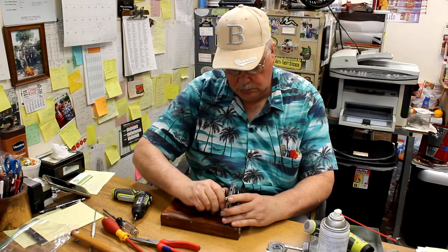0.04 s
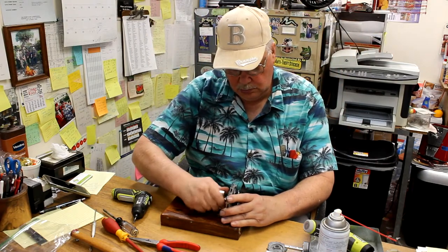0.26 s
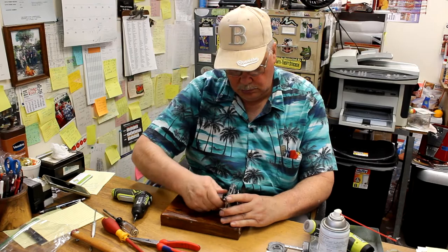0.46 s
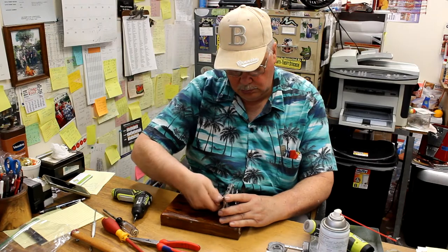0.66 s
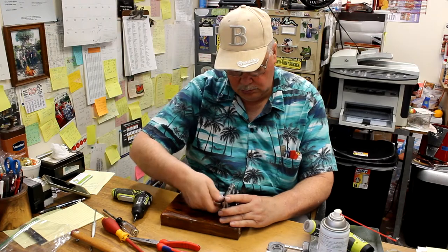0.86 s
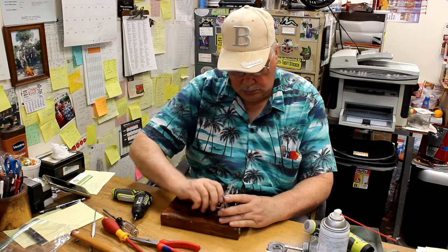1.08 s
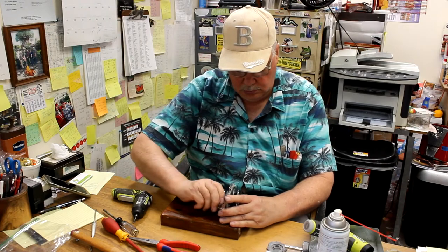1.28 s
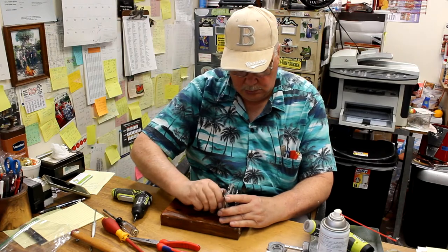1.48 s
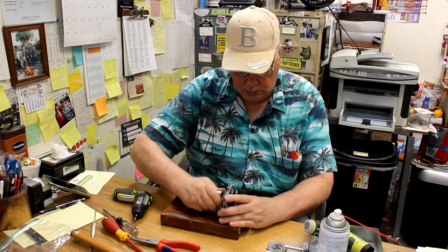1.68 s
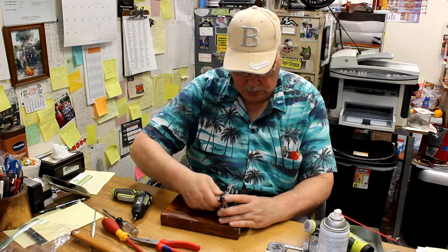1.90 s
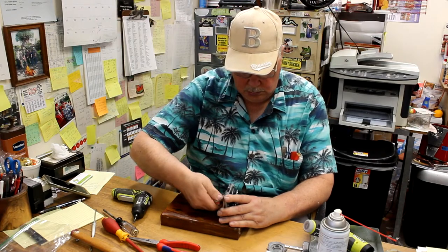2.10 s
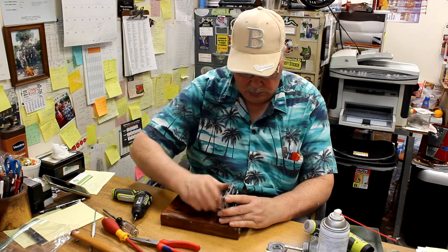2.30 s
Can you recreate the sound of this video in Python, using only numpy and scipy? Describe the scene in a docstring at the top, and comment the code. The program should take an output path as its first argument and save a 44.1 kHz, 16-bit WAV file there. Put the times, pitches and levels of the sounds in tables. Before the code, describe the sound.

Sharp metal ratchet clicks as a hand-turned coin mechanism snaps, jangles and clunks on a workbench.

```python
"""Over a low mains hum, the crank of a small coin mechanism is turned twice by hand in a small room.
On the first turn loose metal ticks, the wooden base clunks on the workbench and a steel pawl snaps
over its ratchet. Between turns the handle knocks softly in its play. On the second turn the base
clunks again, a coin jangles and rings, and metal scrapes round in the housing.
Three more pawl snaps and a soft double knock of the handle finish it."""
import sys
import numpy as np
from scipy import signal
from scipy.fft import rfft, irfft
from scipy.io import wavfile

SR = 44100
rng = np.random.default_rng(int(sys.argv[2]) if len(sys.argv) > 2 else 0)


def transcribe(u):
    """Save the signal u as a 16-bit wav file named by the first command-line argument.

    u: samples, shape (n,) or (channels, n), limited to [-1, 1]; the rate is SR.
    q: integer samples, one column per channel.
    """
    v = np.clip(np.atleast_2d(u).T, -1, 1)
    q = np.round(v * 32767).astype(np.int16)
    wavfile.write(sys.argv[1], SR, q)


N = 108045
TIME, T = np.arange(N) / SR, np.arange(SR // 2) / SR  # time axes of the scene and of one hit [s]
CHATTER_S, CHATTER_TILT_DB = 0.0078, -1  # steel chatter: decay, and dulling per octave
PAWL_WIDTH_HZ = 600
# tone of struck steel (frequency [Hz], level [dB])
STEEL = [(100, -30), (850, -30), (1150, -1), (1380, -10.5), (1600, 0), (1870, -6.5), (2200, -1.5),
         (2600, -2), (3800, 2.5), (5300, 3), (6100, 2), (7100, 2), (8500, -2), (10200, -1.5), (11200, -9.5),
         (13500, -16.5), (16000, -24.5)]
# tone of the metal housing (frequency [Hz], level [dB])
HOUSING = [(100, -12), (400, -3), (720, -10.5), (900, -0.5), (1030, -4.5), (1220, 7), (1350, -8.5),
           (1620, 3), (1900, -4), (2400, 3), (3200, -6.5), (3700, -11.5), (4800, -9), (5600, -22),
           (9000, -33), (15000, -59)]
# envelope of metal dragging round the housing (time [s], level [dB])
DRAG = [(1.38, -50), (1.44, -62), (1.50, -47.5), (1.58, -50), (1.66, -50), (1.70, -39), (1.735, -52),
        (1.775, -33.5), (1.82, -44.5), (1.87, -37), (1.895, -44), (1.925, -38), (1.985, -35), (2.04, -42.5),
        (2.11, -43.5), (2.135, -67)]


def amp(db):
    """Decibels to gain."""
    return 10 ** (np.asarray(db) / 20)


def read(points, hz):
    """A table joined by straight lines over log frequency."""
    f, value = np.transpose(points)
    return np.interp(np.log(hz + 1), np.log(f + 1), value)


def fader(points, outside_db=None):
    """A gain curve over the scene through (time [s], level [dB]) points."""
    return amp(np.interp(TIME, *np.transpose(points), left=outside_db, right=outside_db))


def evened(x):
    """Scales to rms 1."""
    return x / np.sqrt(np.mean(x ** 2) + 1e-20)


def unit(x):
    """Scales a hit to the energy of 5 ms at rms 1."""
    return x / np.sqrt(np.sum(x ** 2) / (.005 * SR) + 1e-20)


def add(mix, s, sound):
    """Mixes a sound in at time s."""
    part = mix[max(round(s * SR), 0):][:len(sound)]
    part += sound[:len(part)]


def through(x, response):
    """Convolves and keeps the length."""
    return signal.fftconvolve(x, response)[:len(x)]


def colour(x, points, tilt_db=0, peaks=(), size=4096):
    """Minimum-phase EQ with a tilt per octave and peaks (centre [Hz], width [Hz], lift [dB])."""
    hz = abs(np.fft.fftfreq(size, 1 / SR))
    db = read(points, hz) + tilt_db * np.log2(np.clip(hz, 100, 5000) / 1000)
    boost = sum(amp(lift) ** 2 / (1 + (2 * (hz - centre) / width) ** 2) for centre, width, lift in peaks)
    db += 10 * np.log10(1 + boost)
    spectrum = np.exp(np.conj(signal.hilbert(np.log(amp(db)))))
    return through(x, np.fft.ifft(spectrum).real[:size // 2])


def burst(decay_s, rise_s=0):
    """A dying chatter of tiny contacts with an even spectrum."""
    fade = np.exp(-T / decay_s) * np.minimum(T / max(rise_s, 1e-5), 1)
    x = rng.standard_normal(len(T)) * fade
    for _ in range(4):  # flatten the spectrum, then shape the decay again
        z = rfft(x)
        x = irfft(z / (abs(z) + 1e-12), len(T)) * np.sqrt(fade)
    return unit(x)


def ring(modes, rise_s=0.002):
    """Dying sines of a struck object (frequency [Hz], level [dB], t60 [s])."""
    sines = sum(amp(db - 60 * T / t60) * np.sin(2 * np.pi * (hz * T + rng.random()))
                for hz, db, t60 in modes)
    return unit(sines * np.minimum(T / rise_s, 1))


def grains(per_s=2500, spread_db=3.5):
    """Tiny slips of uneven size."""
    slips = rng.choice([-1, 1], N) * amp(spread_db * np.minimum(rng.exponential(1, N), 4))
    return slips * (rng.random(N) < per_s / SR)


def background():
    """A bed of room air and mains hum that dips briefly near the end."""
    # tone of the air (frequency [Hz], level [dB])
    air_tone = [(15, -39.5), (25, -10.5), (180, -7), (249, -12), (405, -11), (560, -14), (714, -18),
                (1070, -14.5), (1480, -19.5), (9320, -33.5), (16000, -53.5)]
    # hum partials ahead of the fader (frequency [Hz], level [dB])
    partials = [(120, -51.5), (240, -52), (356, -60.5)]
    # fader ride on the whole bed (time [s], gain [dB])
    ride = [(2.12, -7), (2.22, -10.5), (2.45, -6.5)]
    air = irfft(rfft(rng.standard_normal(N)) * amp(read(air_tone, np.fft.rfftfreq(N, 1 / SR))), N)
    hum = sum(amp(db) * evened(np.sin(2 * np.pi * (hz * TIME + rng.random()))) for hz, db in partials)
    return (amp(-46) * evened(air) + hum) * fader(ride)


def ticks():
    """Loose metal parts chatter lightly, without a hard attack, and tap the base."""
    # (time [s], level [dB], resonance [Hz], base tap [dB])
    cues = [(0.2108, -33, 9700, 1), (0.4672, -37, 3360, 3), (0.5678, -25.5, 6100, -7.5),
            (0.659, -37.5, 6800, -4), (0.7998, -33, 4970, -12), (1.3944, -23, 5900, -2.5),
            (1.411, -27, 6060, 0), (1.437, -34, 6540, -11), (1.8674, -42.5, 10300, 9.5)]
    out = np.zeros(N)
    for s, db, hz, base_db in cues:
        chatter = unit(colour(burst(CHATTER_S), STEEL, CHATTER_TILT_DB, [(hz, PAWL_WIDTH_HZ, 7)]))
        add(out, s, amp(db) * (chatter + amp(base_db) * base_tap()))
    return out


def base_tap():
    """The wooden base answers a click and gives it body."""
    # tone of the tapped base (frequency [Hz], level [dB])
    tap_tone = [(60, -26.5), (120, 3.5), (220, -13), (350, -2.5), (480, 1), (600, -7), (700, -1),
                (830, -12.5), (1500, -12), (8000, -79)]
    return unit(colour(burst(decay_s=0.0041, rise_s=.002), tap_tone))


def base_clunks():
    """The base rocks: the wooden block thuds on the bench and the board rings."""
    # (time [s], level [dB], bass weight [dB/octave], decay [s], block thud [dB])
    cues = [(0.2109, -26.5, -4, 0.01, -6), (.3120, -17.5, 1, .0053, 0), (0.3244, -18.5, -1, 0.01, -16),
            (.335, -21.5, 5, 0.028, -3), (1.3807, -22.5, -2.5, 0.0044, 5), (1.3920, -22, 0, 0.007, -12),
            (1.407, -36, 1.5, 0.008, -29), (1.741, -36.5, 4.5, 0.017, 0.5), (1.87, -36.5, 4, 0.029, -1)]
    # tone of wood on wood (frequency [Hz], level [dB])
    wood_tone = [(15, -59), (35, -35.5), (75, -1), (160, -6), (340, -1.5), (500, -4), (700, -9),
                 (870, -6.5), (1300, -22.5), (3000, -24.5), (6000, -36), (14000, -62.5)]
    # modes of the board (frequency [Hz], level [dB], t60 [s])
    board_modes = [(114.6, -4.5, 0.19), (180.5, -1.5, 0.09), (246, 6, 0.059), (338, 2, .1), (410, 0.5, .04),
                   (520, -15, 0.043), (879, 0, 0.082), (1193, -11, 0.079)]
    out = np.zeros(N)
    for s, db, weight_db, decay_s, block_db in cues:
        weighted = [(hz, level - weight_db * np.log2(hz), t60) for hz, level, t60 in board_modes]
        board = amp(2) * ring(weighted, rise_s=0.0057)
        impact = unit(colour(burst(decay_s, rise_s=0.0032), wood_tone, -weight_db))
        thud = amp(block_db) * ring([(356.7, 0, 0.032)], rise_s=0.017)
        add(out, s, amp(db) * (unit(impact + board) + thud))
    return out


def ratchet():
    """Each snap is a hard contact and a chatter that ring pawl, wheel and tip and tap the base."""
    # pawl snaps (time [s], level [dB], pawl pitch [Hz], pawl lift [dB], wheel pitch [Hz],
    # wheel lift [dB], tip lift [dB], base tap [dB], chatter against contact [dB])
    snaps = [(.3160, -16, 4840, -8, 8000, 3, -2, -3.5, 36),
             (0.3523, -14, 4900, 6.5, 7700, 10, 4.5, -16.5, 11),
             (0.4908, -15, 4540, -0.5, 7600, 10.5, 7.5, -10.5, 4),
             (0.6058, -13.5, 4820, 6.5, 7570, 9, 10.5, -12.5, -3.5),
             (.6902, -16, 4980, 7, 7600, 4.5, 10, -16, -3), (0.8095, -19, 5130, 5, 7540, 4, 8.5, -15, 3),
             (1.9349, -14, 2930, 8, 7750, 12.5, 3, -12.5, 2),
             (2.0129, -15, 5700, 6, 7050, 4.5, -21, -28.5, 10),
             (2.1416, -15, 4280, 8.5, 7200, 6.5, 5.5, -18.5, -0.5)]
    # early reflections off the bench (delay [s], level [dB])
    bench_echoes = [(.0037, -10.5), (.0074, -11)]
    wheel_width_hz, tip_hz, tip_width_hz = 600, 9600, 1000
    out = np.zeros(N)
    for s, db, pawl_hz, pawl_db, wheel_hz, wheel_db, tip_db, base_db, chatter_db in snaps:
        peaks = [(pawl_hz, PAWL_WIDTH_HZ, pawl_db), (wheel_hz, wheel_width_hz, wheel_db),
                 (tip_hz, tip_width_hz, tip_db)]
        contact = unit(colour(burst(decay_s=0.0013, rise_s=0.000514), STEEL, peaks=peaks))
        chatter = amp(chatter_db) * unit(colour(burst(CHATTER_S), STEEL, CHATTER_TILT_DB, peaks))
        add(out, s, amp(db) * (unit(contact + chatter) + amp(base_db) * base_tap()))
        for delay_s, echo_db in bench_echoes:
            scatter_s = .0005 * rng.uniform(-1, 1)
            echo = unit(colour(burst(decay_s=0.0015), STEEL, CHATTER_TILT_DB, peaks))
            add(out, s + delay_s + scatter_s, amp(db + echo_db) * echo)
    add(out, .5672, amp(-38) * ring([(12300, 0, 0.08)]))  # the pawl spring pings once
    return out


def handle_knocks():
    """The handle knocks in its play, damped by the hand, with a faint tick of the housing."""
    # (time [s], level [dB], pitch [Hz], metal tick [dB])
    cues = [(.53, -35, 402, -16), (0.764, -34, 359, -11), (0.9979, -32.5, 386, -33),
            (1.2283, -35, 383, -14), (1.622, -40.5, 388, -20), (1.742, -37, 485, -13),
            (1.869, -37, 437, -24), (2.3247, -31.5, 397, -37), (2.3585, -40.5, 395, -23)]
    # modes of the handle (multiple of the pitch, level [dB], t60 [s])
    modes = [(0.999, 0, 0.023), (1.8, -10.5, 0.021)]
    out = np.zeros(N)
    for s, db, hz, tick_db in cues:
        bump = ring([(hz * multiple, level, t60) for multiple, level, t60 in modes], rise_s=0.0048)
        tick = unit(colour(burst(CHATTER_S), HOUSING, tilt_db=16))
        add(out, s, amp(db) * (bump + amp(tick_db) * tick))
    return out


def coin():
    """Loose metal jangles as the coin enters; each touch renews its thin, high ring."""
    # envelope of the jangle (time [s], level [dB])
    jangle = [(1.378, -58), (1.388, -25.5), (1.42, -41), (1.445, -50), (1.46, -40), (1.48, -47),
              (1.52, -74)]
    # the coin is struck and rings until damped (time [s], level [dB], t60 [s])
    hits = [(1.3942, -29, 0.037), (1.4125, -26, 0.26), (1.4480, -31, 0.11), (1.482, -30.5, 0.24),
            (1.524, -33.5, 0.037), (1.556, -43.5, 0.84), (1.775, -52.5, 0.9), (1.845, -48, 0.81)]
    # modes of the coin (frequency [Hz], level [dB])
    modes = [(8882, 1), (8912, 0.5), (8975, -9), (14830, -17), (14890, -23)]
    out = fader(jangle, outside_db=-120) * evened(colour(grains(), STEEL))
    for s, db, t60 in hits:
        add(out, s, amp(db) * ring([(hz, level, t60) for hz, level in modes], rise_s=0.0027))
    return out


def scrape():
    """Slips of dragging metal swell at each catch and ring the housing."""
    # (time [s], level [dB], rise [s], decay [s], brightness [dB/octave])
    catches = [(1.388, -43, 0.005, 0.014, 16), (1.46, -33.5, 0.0027, 0.0091, 26.5),
               (1.47, -26.5, 0.0087, 0.0075, -3.5), (1.524, -21, 0.0023, 0.0049, 12),
               (1.5351, -24.5, .003, 0.0085, 0), (1.618, -23.5, 0.0054, 0.0049, 3.5),
               (1.689, -43, 0.004, 0.025, -1.5), (1.7820, -29, 0.0014, 0.0025, 11),
               (1.848, -28, 0.0021, 0.0045, 8), (1.919, -25, 0.0018, 0.0048, 10.5),
               (2.066, -33.5, 0.0056, 0.0029, 7.5)]
    rub = fader(DRAG, outside_db=-120) * evened(colour(grains(), HOUSING))
    for s, db, rise_s, decay_s, tilt_db in catches:
        age = TIME - s
        swell = np.exp(-np.where(age < 0, (age / (2 * rise_s)) ** 2, age / decay_s))
        rub += amp(db) * unit(swell * colour(grains(), HOUSING, tilt_db))
    return rub + amp(-7.5) * np.std(rub) * housing_ring(rub)


def housing_ring(rub, step_s=.06, detune_per_khz=.012, spread_db=4):
    """As the contact slides on, the housing's modes shift in strength and pitch; high ones bend most."""
    # modes of the housing (frequency [Hz], level [dB], t60 [s])
    modes = [(930, -8, 0.24), (1216, 2.5, 0.14), (1490, 10, 0.036), (1704, 8, 0.082), (2090, 4, 0.044),
             (2400, 10.5, 0.064), (2740, -1, 0.0515), (3130, 7, .06), (5120, -4, 0.026)]
    out = np.zeros(N)
    for s in np.arange(DRAG[0][0], DRAG[-1][0], step_s):
        shifted = [(hz * (1 + detune_per_khz * hz / 1000 * rng.standard_normal()),
                    db + spread_db * rng.standard_normal(), t60) for hz, db, t60 in modes]
        crossfade = np.sqrt(np.maximum(1 - abs(TIME - s) / step_s, 0))
        out += through(rub * crossfade, ring(shifted))
    return evened(out)


def room(send, onset_s=0.0028):
    """The short, dense tail of a cluttered room, longest in the bass."""
    # tone of the tail (frequency [Hz], level [dB])
    tone = [(200, 1.5), (1500, 4.5), (2800, -0.5), (5000, -1), (8000, -1.5), (14000, -5)]
    # reverb time (frequency [Hz], t60 [s])
    decay = [(100, 0.44), (300, 0.21), (1000, 0.15), (4000, .17), (8000, .18), (15000, 0.14)]
    hz, t, noise = signal.stft(rng.standard_normal(len(T)), SR, nperseg=256)
    fade = amp(read(tone, hz)[:, None] - 60 * t / read(decay, hz)[:, None])
    tail = signal.istft(noise * fade, SR, nperseg=256)[1][:len(T)]
    tail *= np.clip(T / onset_s - .5, 0, 1)  # a brief gap, then the tail fades in
    return through(send, tail / np.linalg.norm(tail))


def scene():
    """Metal, wood and handle, each with its own room send, over the background in mono."""
    metal = ratchet() + ticks() + coin() + scrape()
    wood, knocks = base_clunks(), handle_knocks()
    tail = room(amp(-8.5) * metal + amp(-9) * wood + amp(-11.5) * knocks)
    return (metal + wood + knocks + tail + background())[None]


def record(dry, ceiling=.9, cutoff_hz=15450):
    """Soft saturation rounds off the highest peaks; a low-pass trims the top."""
    lowpass = signal.firwin(255, cutoff_hz, window=("kaiser", 8), fs=SR)
    return signal.oaconvolve(ceiling * np.tanh(dry / ceiling), lowpass[None], "same")


dry = scene()
out = record(dry)
transcribe(out)
```